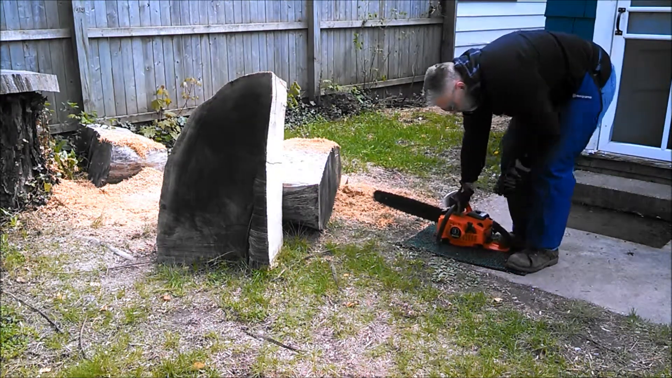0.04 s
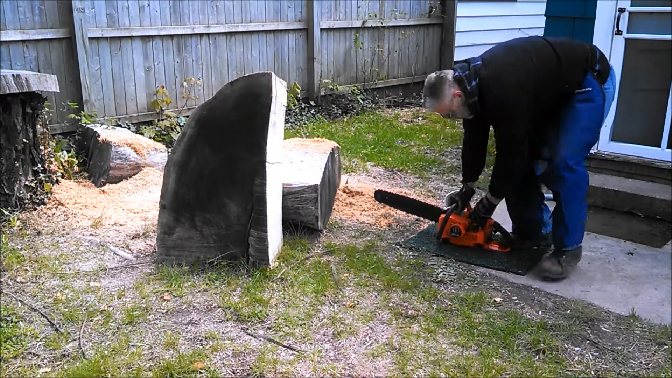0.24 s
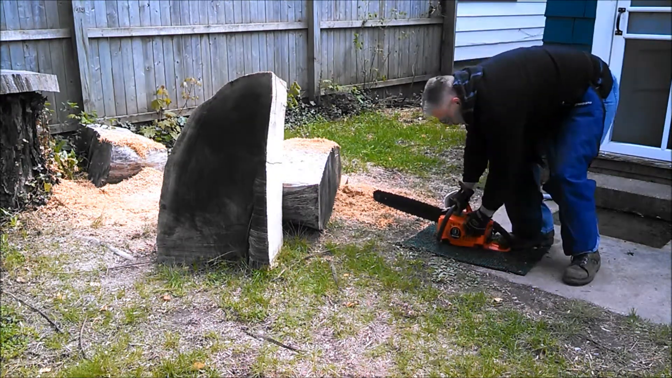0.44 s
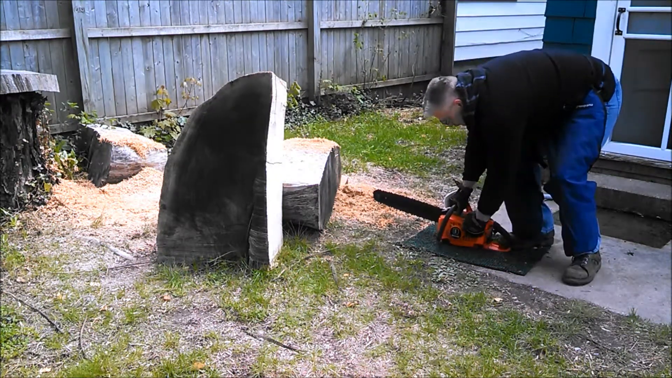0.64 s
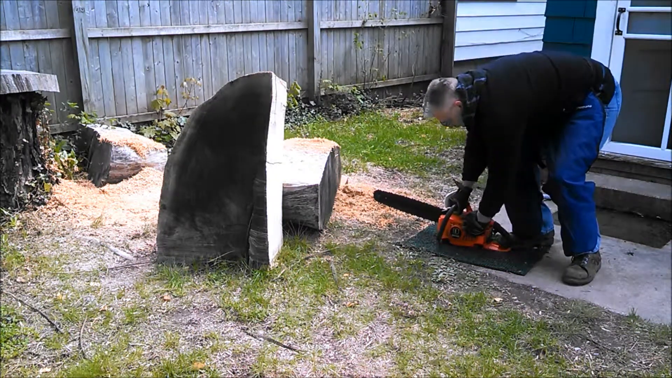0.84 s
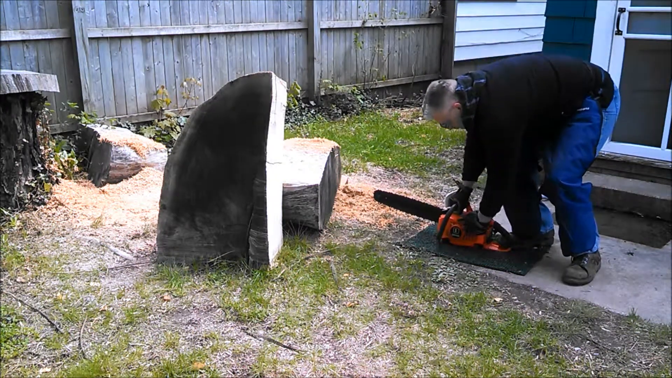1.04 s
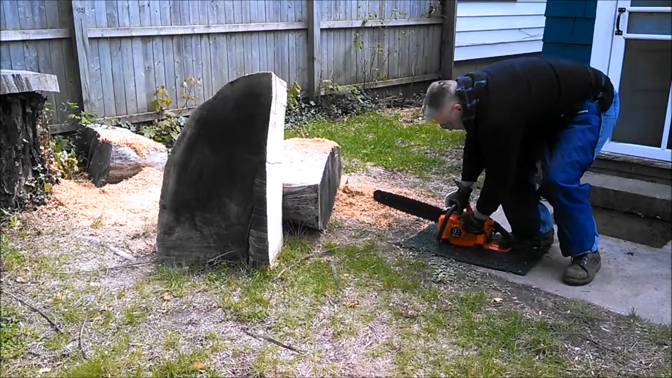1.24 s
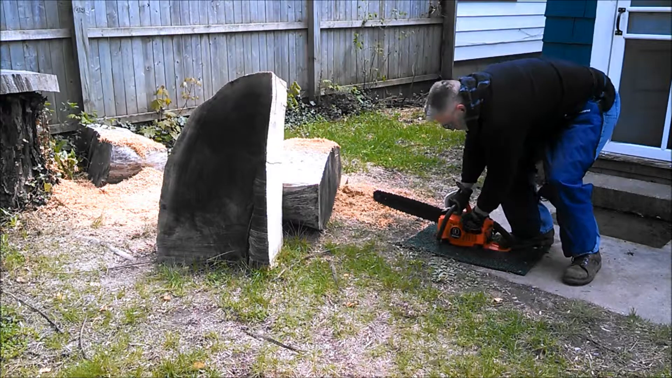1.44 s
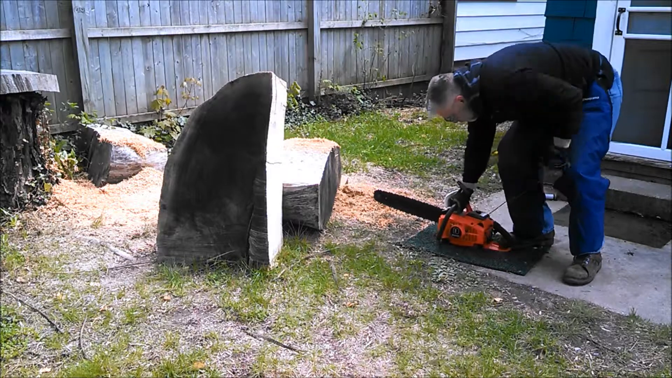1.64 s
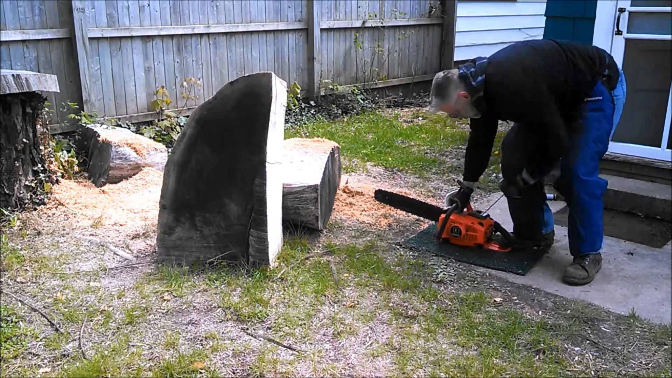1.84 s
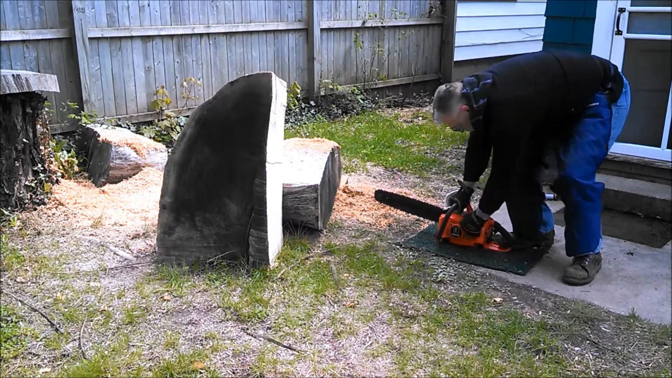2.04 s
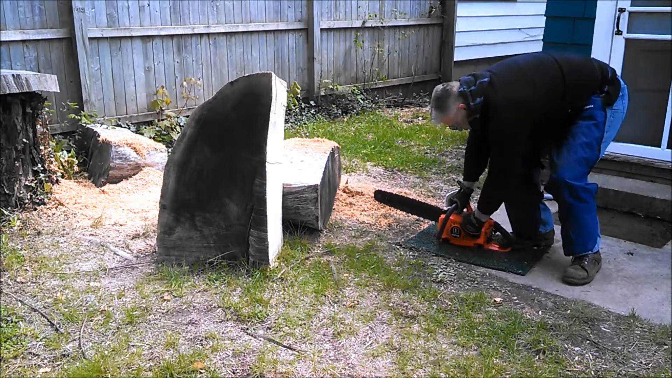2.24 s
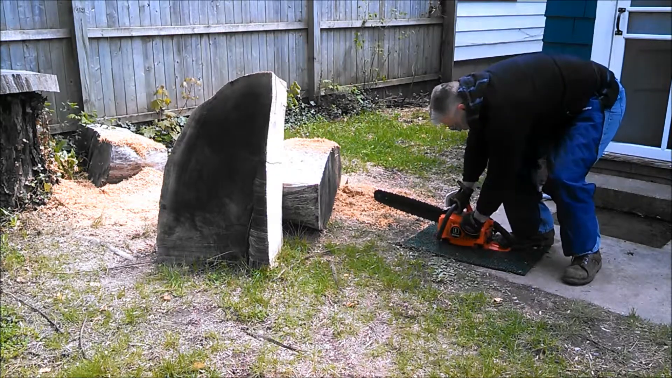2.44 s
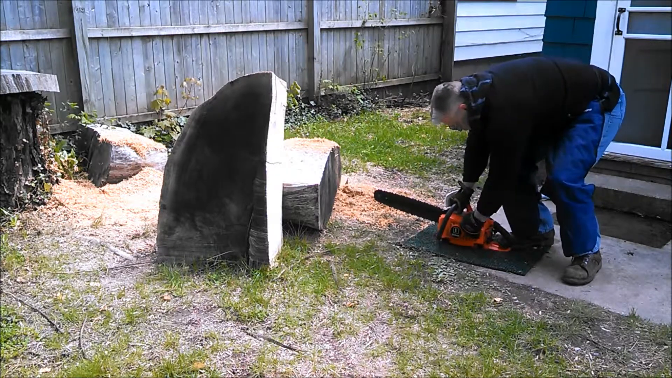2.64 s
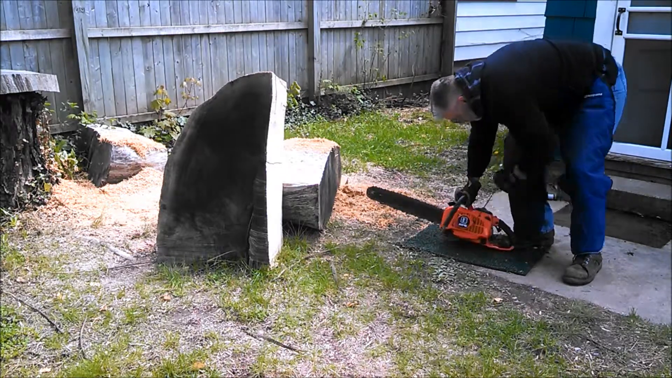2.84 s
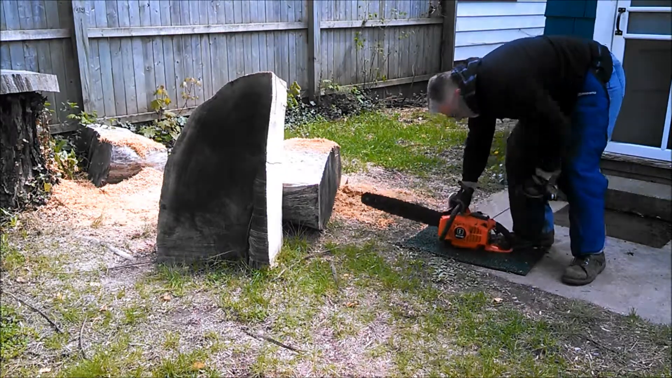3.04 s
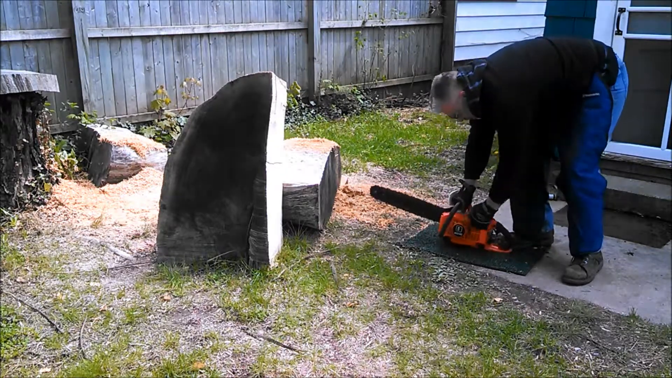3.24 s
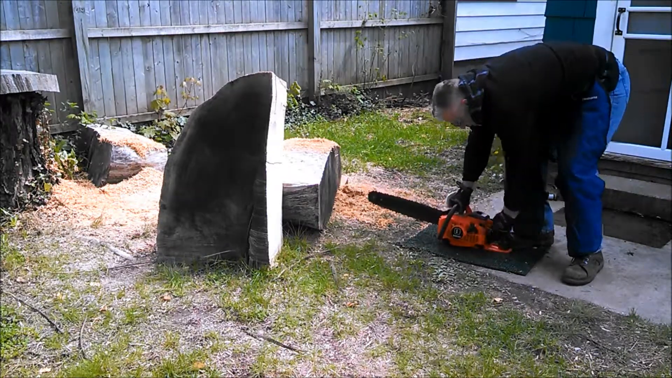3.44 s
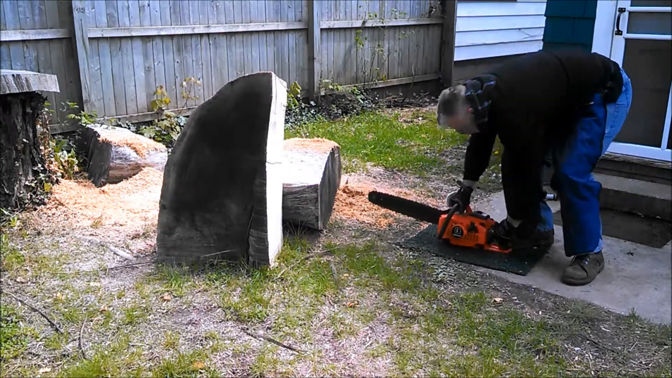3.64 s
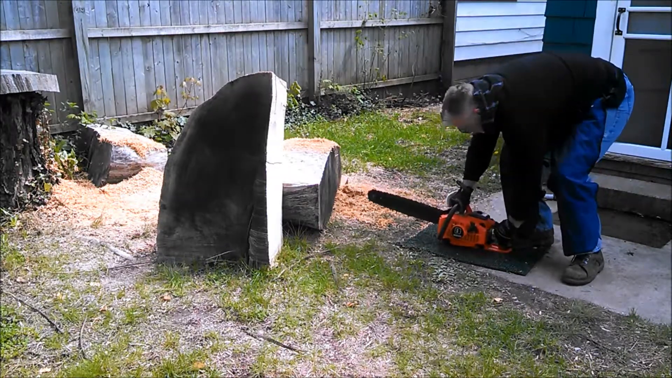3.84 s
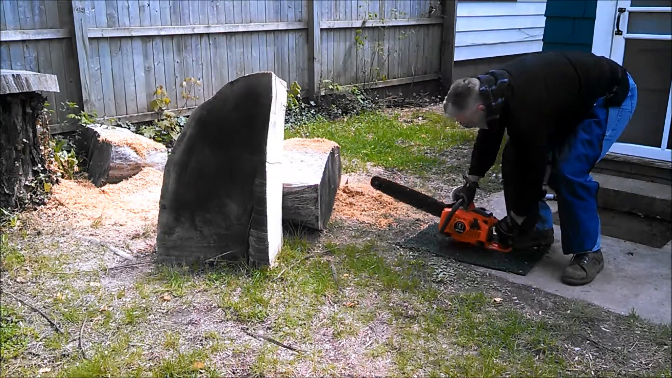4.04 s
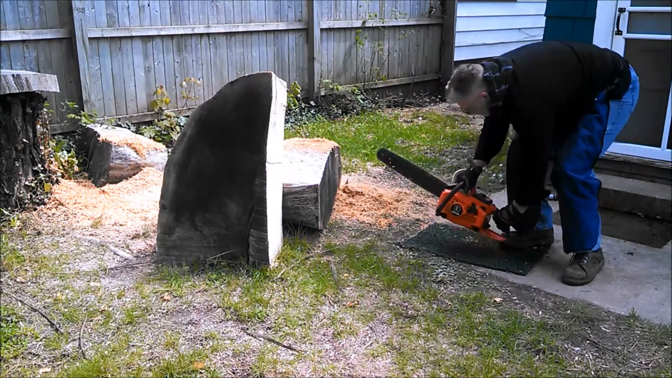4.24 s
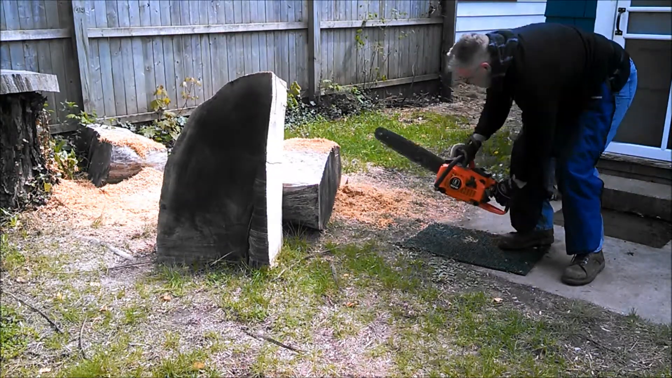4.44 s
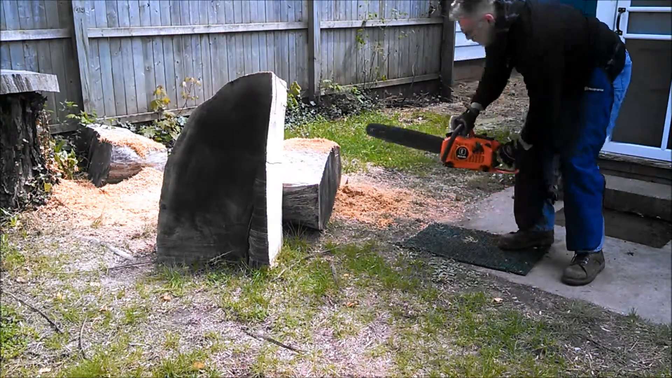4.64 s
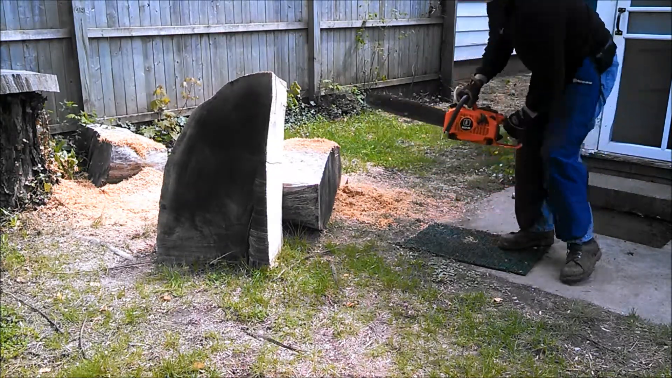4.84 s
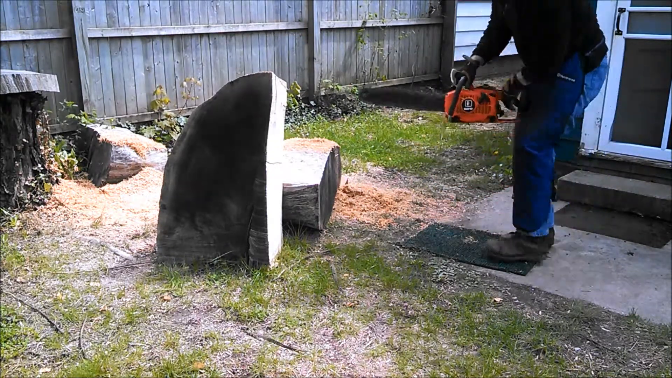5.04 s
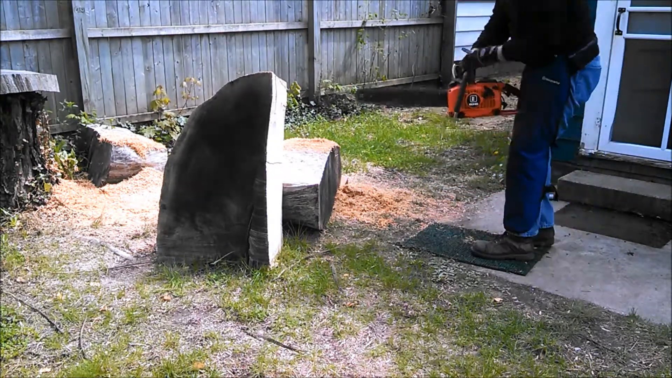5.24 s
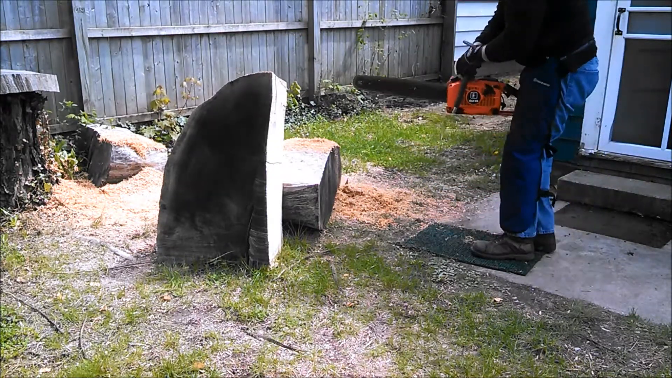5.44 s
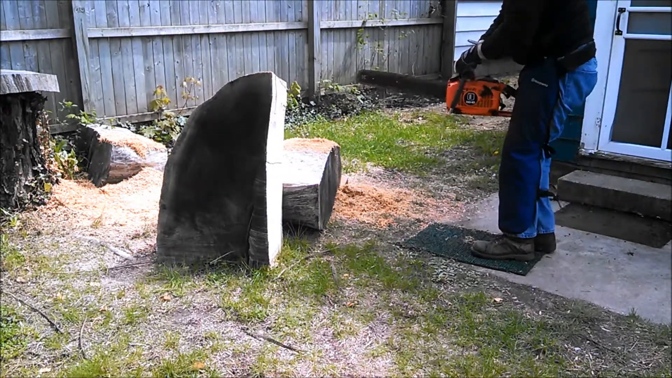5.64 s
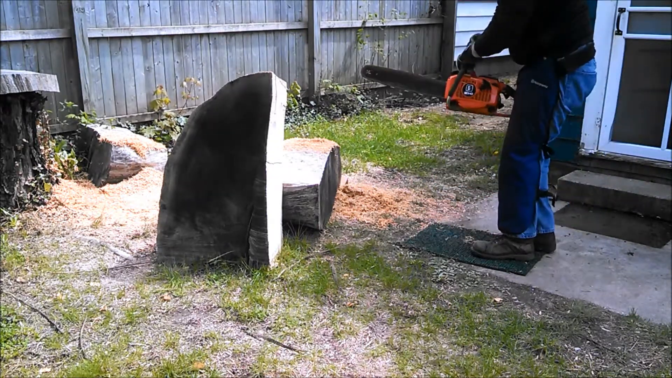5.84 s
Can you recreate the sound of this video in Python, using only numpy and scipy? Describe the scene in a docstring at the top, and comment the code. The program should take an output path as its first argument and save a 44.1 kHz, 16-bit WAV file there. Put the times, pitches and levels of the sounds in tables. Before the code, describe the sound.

A two-stroke chainsaw coughs and dies on the first cord pull, catches on the second, idles and revs twice, with birds nearby.

```python
"""Birds whistle in a fenced back yard; a shoe scuffs and a two-stroke chainsaw knocks on the ground.
At 1.6 s the starter cord is pulled, and the cold engine coughs and dies. On the second pull it catches
at 3 s and idles, each firing sending a puff through the muffler. From 3.9 s it is lifted and revved
twice, so the puffs merge into a hum and the chain hisses; then it coasts down. All along, the house
wall throws back every firing, and a delayed cross-feed widens the stereo sound."""
import sys
import numpy as np
from scipy import signal
from scipy.fft import rfft, irfft, next_fast_len
from scipy.io import wavfile
from scipy.ndimage import uniform_filter1d

SR = 44100
rng = np.random.default_rng(int(sys.argv[2]) if len(sys.argv) > 2 else 0)


def int16_out(signal):
    """Quantize to a 16-bit WAV file."""
    q = np.round(np.clip(np.atleast_2d(signal).T, -1, 1) * 32767)
    wavfile.write(sys.argv[1], SR, q.astype(np.int16))


N = 260190
TIME = np.arange(N) / SR


def from_db(db):
    """Turn decibels into a number to multiply by."""
    return 10 ** (np.asarray(db) / 20)


def rms_one(x):
    """Scale a sound to an average power of 1."""
    return x / np.sqrt(np.mean(x ** 2) + 1e-20)


def in_time(rows):
    """Join (time, value) points with straight lines."""
    return np.interp(TIME, *np.transpose(rows))


def after(start):
    """A soft switch that turns on at the given time."""
    return np.clip((TIME - start) / .007 + .5, 0, 1)


def during(rows):
    """A soft switch that is on from a table's first time to its last."""
    on = (TIME >= rows[0][0]) & (TIME <= rows[-1][0] + .005)
    return uniform_filter1d(1.0 * on, size=300)


def drift(rate):
    """A random wobble around 0 that picks a new value `rate` times a second."""
    return np.interp(TIME * rate, np.arange(4000), rng.standard_normal(4000))


def gains(points, size):
    """Spread (frequency, level) points over the frequencies of an FFT."""
    hz, db = np.transpose(points)
    grid_hz = np.arange(size // 2 + 1) * SR / size
    return from_db(np.interp(np.log(grid_hz + 1), np.log(hz), db))


def convolve(x, response):
    """Give every sample of a sound the same tail."""
    return signal.oaconvolve(x, response)[:N]


def colour(x, points, size=4096):
    """Give a sound a tone colour, with a filter that never rings ahead of it (minimum phase)."""
    cepstrum = irfft(np.log(gains(points, size)))
    cepstrum[1:size // 2] *= 2
    cepstrum[size // 2 + 1:] = 0
    response = irfft(np.exp(rfft(cepstrum)))
    return convolve(x, response / np.linalg.norm(response))


def soft_filter(x, kind, hz):
    """Gently keep the "low" or the "high" part of a sound."""
    return signal.sosfilt(signal.butter(1, hz, kind, fs=SR, output="sos"), x)


def clicks(times, heights):
    """Clicks at exact times, each shared between two neighbouring samples."""
    at = np.clip(np.asarray(times) * SR, 0, N - 2)
    whole, part = at.astype(int), at % 1
    return np.bincount(whole, heights * (1 - part), N) + np.bincount(whole + 1, heights * part, N)


def decay(x, t60):
    """Each click dies away; t60 is its fade time, the seconds it takes to fall 60 dB."""
    return signal.lfilter([1], [1, -from_db(-60 / (t60 * SR))], x + 1e-18)


def noise_bursts(x, t60):
    """Each click becomes a fading burst of noise."""
    return decay(x, t60) * rng.standard_normal(N)


def ring(x, hz, t60):
    """Each click starts a fading pure note."""
    shrink, step = from_db(-60 / (t60 * SR)), 2 * np.pi * hz / SR
    return signal.lfilter([0, np.sin(step)], [1, -2 * shrink * np.cos(step), shrink ** 2], x + 1e-18)


# tone of the distant town: (frequency [Hz], level [dB])
TOWN_TONE = [(25, -2), (60, 0), (100, -1.5), (200, -12.5), (400, -16), (650, -20.5), (950, -21.5),
             (1800, -29), (4000, -32.5), (5000, -34), (7000, -37), (10000, -42), (15000, -51)]
def outdoor_air():
    """Steady town noise, a little different in each ear."""
    mid, side = [colour(noise, TOWN_TONE) for noise in rng.standard_normal((2, N))]
    return from_db(-46) * (mid + from_db(-3) * side * np.array([[1], [-1]]))


# calls: (start [s], length [s], first pitch [Hz], middle pitch [Hz], last pitch [Hz], level [dB])
BIRD_CALLS = [(-.06, 0.17, 2450, 2628, 2400, -34.5), (0.104, 0.21, 4600, 4720, 4470, -49),
              (0.109, 0.086, 6470, 6600, 6830, -52), (0.884, 0.038, 5400, 4820, 4570, -53),
              (1.352, 0.04, 6100, 5900, 5700, -58), (2.322, 0.038, 4930, 4580, 4400, -66),
              (3.053, 0.29, 8700, 9270, 8660, -51), (3.235, 0.15, 2520, 2580, 2640, -37.5)]
def birds():
    """Thin, quavering whistles that bend through three pitches."""
    out = np.zeros(N)
    waver, quaver = 1 + .012 * drift(120), from_db(4 * drift(70) - 2)
    for start, length, *pitches, db in BIRD_CALLS:
        on = (TIME > start) & (TIME < start + length)
        progress = (TIME[on] - start) / length
        hz = np.polyval(np.polyfit([0, .5, 1], pitches, 2), progress) * waver[on]
        out[on] += from_db(db) * np.sin(np.pi * progress) * np.sin(2 * np.pi * np.cumsum(hz) / SR)
    return out * quaver


# a shoe and clothes rub as someone crouches: (time [s], level [dB])
SCUFF_LOUDNESS = [(0, -39.5), (.31, -43), (.376, -31.5), (.46, -46)]
# tone of the rubbing: (frequency [Hz], level [dB])
SCUFF_TONE = [(60, -32), (190, -16), (300, -1), (550, 4), (1100, -1.5), (2000, -0.5), (4500, -4.5),
              (7000, -8), (10000, -16), (15000, -34)]
def scuff():
    """Grit and cloth rub in uneven grains."""
    grains = rng.standard_normal(N) * from_db(in_time(SCUFF_LOUDNESS) - 12.5 + 4.3 * drift(146.4))
    return colour(grains * during(SCUFF_LOUDNESS), SCUFF_TONE)


# how far the sound leans left: (frequency [Hz], side level relative to the middle [dB])
LEFT_LEAN = [(100, -16.5), (300, -15.5), (1200, -13.5), (1700, -4), (2400, -4.5), (3600, 2), (7500, 1),
             (12000, 2)]
def from_the_side(x):
    """The sound is louder on the left, most of all in the treble."""
    size = next_fast_len(N + 4096, real=True)
    side = irfft(rfft(x, size) * gains(LEFT_LEAN, size), size)[:N]
    return np.array([x + side, x - side])


# the saw is lifted: (time [s], height [m])
SAW_HEIGHT = [(4.15, 0.026), (4.5, 0.11), (4.7, 0.36), (5.1, 0.72), (5.35, 0.893), (5.9, 0.86)]
def over_ground(x, lag_ms_per_m=1.765):
    """The bounce off the ground comes later as the saw rises, sweeping a dip down through its tone."""
    bounce = .25 * soft_filter(x, "low", hz=2050)
    lag_s = in_time(SAW_HEIGHT) * lag_ms_per_m / 1000
    return x - bounce + np.interp(TIME - lag_s, TIME, bounce)


def with_echoes(x, lags_ms=(5.22, 7.48, 8.14), strengths=(.064, .19, -.18), db_per_m=-2):
    """Slab, house wall and steps send back dull echoes that weaken as the saw is lifted."""
    echoes = sum(gain * np.interp(TIME - ms / 1000, TIME, x) for ms, gain in zip(lags_ms, strengths))
    echoes *= from_db(db_per_m * in_time(SAW_HEIGHT))
    return from_the_side(x + soft_filter(echoes, "low", hz=1400))


def yard(x, scatter_db, apart_db, t60):
    """Sound and echoes come from one side; fence and house scatter a short tail from all round."""
    t = TIME[:SR // 2]
    tails = rng.standard_normal((3, len(t))) * from_db(-60 * t / t60) * (t > .009)
    both, left, right = [convolve(x, tail / np.linalg.norm(tail)) for tail in tails]
    apart = soft_filter([left, right], "high", hz=2200)  # the two tails differ mainly in the treble
    return with_echoes(x) + from_db(scatter_db) * both + from_db(apart_db) * apart


# the notes of the saw's housing: (pitch [Hz], level [dB], fade time [s])
HOUSING_NOTES = [(1170, 3, .06), (1430, 5, .05), (1630, 2, .04)]
def struck_housing(times, db):
    """Each blow rings every note of the housing, with a slightly random strength."""
    return sum(ring(clicks(times, from_db(db + note_db + rng.normal(0, .9, len(times)))), hz, t60)
               for hz, note_db, t60 in HOUSING_NOTES)


# the four parts of a blow, dull to bright: (frequency [Hz], level [dB])
THUMP_TONE = [(50, -59), (150, -4), (240, 10), (310, 8.5), (550, 0.5), (900, -6.5), (2000, -52.5)]
CLACK_TONE = [(300, 7.5), (800, 7), (1300, 7), (2200, 1.5), (3200, -21), (8000, -58)]
SNAP_TONE = [(1000, -44), (2800, 3.5), (3700, -1), (5200, -0.5), (7000, -2.5), (9500, -17), (15000, -35.5)]
CRACK_TONE = [(2000, -25), (5000, -25), (8000, 28), (12000, 13.5), (15000, 10)]
def blows(times, thump_db, clack_db, snap_db, crack_db):
    """A blow makes a short burst in the saw's housing and sets its notes ringing."""
    def burst(db, tone, t60):
        """A click followed by dying chatter."""
        hits = clicks(times, from_db(db))
        return colour(noise_bursts(hits, t60) - 4 * hits, tone)
    dull = burst(thump_db, THUMP_TONE, t60=.055) + burst(clack_db, CLACK_TONE, t60=.033)
    bright = burst(snap_db, SNAP_TONE, t60=.034) + burst(crack_db, CRACK_TONE, t60=.043)
    return dull + bright + from_db(-15.5) * struck_housing(times, snap_db)


# knocks of the housing and starter: (time [s], level [dB], hardness [dB])
HOUSING_KNOCKS = [(0.254, -42, 7), (0.294, -55, 11), (0.359, -38, -17), (0.368, -33.5, 10),
                  (0.376, -30.5, -8), (.479, -23.5, -1), (0.517, -39, 9), (0.549, -47, 10), (0.607, -45, 4),
                  (1.667, -25, -3), (1.830, -31, 11), (1.84, -36, 5), (1.847, -29, 9), (2.081, -37, 6.5),
                  (2.088, -43, 8), (2.114, -34.5, 7.5), (2.207, -30, -5), (2.231, -30, 8.5),
                  (2.242, -35, 4), (2.325, -35, -3), (2.383, -37, 2), (2.407, -30, 5), (2.41, -32, 3),
                  (2.437, -42, 3), (2.822, -37.5, 5.5), (2.878, -31, 1), (3.012, -22, 5),
                  (3.042, -22.5, 2.5), (3.106, -36, 11), (3.507, -28, 4), (5.381, -28, 10.5),
                  (5.461, -19, 2), (5.864, -15, -12)]
# rows for thump, clack, snap and crack: (level [dB], change with hardness [dB per dB])
KNOCK_PARTS = [(-4, -0.55), (-2.5, 0), (-8.5, 0.66), (-31.5, 2.5)]
def knocks():
    """The harder the contact, the less thump and the more crack."""
    times, db, hardness_db = np.transpose(HOUSING_KNOCKS)
    return blows(times, *[db + part_db + slope * hardness_db for part_db, slope in KNOCK_PARTS])


# thuds, then clinks, one note a row: (time [s], level [dB], pitch [Hz], fade time [s])
GROUND_THUDS = [(.479, -24.5, 480, 0.068), (.479, -16.5, 353, 0.037), (.479, -28, 240, 0.027),
                (.525, -22.5, 290, 0.029), (.565, -34, 247, 0.033)]
STARTER_CLINKS = [(1.833, -27, 3420, 0.038), (1.849, -34, 3420, 0.073), (1.850, -23, 7170, 0.015),
                  (2.115, -36, 6730, 0.03), (2.233, -36.5, 3344, 0.081), (2.327, -49, 6730, .05),
                  (2.406, -42, 3380, 0.073), (2.406, -45, 7080, 0.13), (2.824, -49, 7140, 0.1),
                  (3.108, -21.5, 3330, 0.028)]
def thuds_and_clinks():
    """The housing thuds as it is pressed down; the starter's catches clink onto the flywheel."""
    return sum(ring(clicks([time], from_db([db])), hz, t60)
               for time, db, hz, t60 in [*GROUND_THUDS, *STARTER_CLINKS])


# the cord runs out or winds back: (start [s], end [s], level at the end [dB])
CORD_RUNS = [(1.63, 1.693, -38), (1.955, 2.036, -31.5), (2.856, 3, -26)]
# rattle and hiss of metal, in starter and engine alike: (frequency [Hz], level [dB])
RATTLE_TONE = [(100, -32), (350, 12), (700, 8.5), (1000, 7), (1300, 2.5), (1520, 3), (1630, 5.5),
               (1730, -4.5), (2100, 0), (2700, 2.5), (3600, -1), (4700, -6), (6500, -12.5), (15000, -53)]
HISS_TONE = [(500, -6), (2000, 8.5), (3500, -5.5), (5000, 3), (6000, 3.5), (7100, 5), (8000, 1.5),
             (9500, -5), (12000, -11), (15000, -20.5)]
def starter_cord(swell_db_per_s=153):
    """The cord runs ever faster, so its reel rattles and hisses ever louder."""
    pull = sum(from_db(db - swell_db_per_s * np.abs(end - TIME)) * after(start) * (1 - after(end))
               for start, end, db in CORD_RUNS)
    grit = from_db(3.3 * drift(350))
    rattle, hiss = from_db(-4) * pull * grit * rng.standard_normal((2, N))
    return colour(rattle, RATTLE_TONE) + from_db(-9) * colour(hiss, HISS_TONE)


# trigger squeezes: (start [s], let go [s], opening [0-1], time to shut [s])
SQUEEZES = [(3.906, 4.138, 0.92, 0.087), (4.1, 4.62, 0.91, 0.03), (4.733, 5.056, 1, 0.1),
            (5.807, 5.9, 0.33, .05)]
def throttle(open_s=.1):
    """How open the throttle is, 0-1: each squeeze opens it, holds it and lets it shut."""
    return np.max([opening * np.clip(np.minimum((TIME - start) / open_s, 1 - (TIME - end) / shut_s), 0, 1)
                   for start, end, opening, shut_s in SQUEEZES], axis=0)


# speeds [turns per s]: idle, clutch fully gripping, pops half merged, load easing, no load left
IDLE_RATE, CLUTCH_RATE, HUM_RATE, EASE_RATE, FREE_RATE = 39.5, 80, 95, 133.4, 156
SPUTTER_DB, SPUTTER_MS = 3, .048  # extra unevenness while coasting
def engine_load(speed):
    """How hard the engine works, 0-1: an open throttle pulls hard until near top speed."""
    return throttle() * np.clip((FREE_RATE - speed) / (FREE_RATE - EASE_RATE), 0, 1)


def coasting(speed):
    """1 while the engine spins well above idle with the throttle shut."""
    return (1 - throttle()) * np.clip(speed / IDLE_RATE - 1, 0, 1)


def humming(speed):
    """Rises from 0 to 1 as the separate pops merge into a tone."""
    return np.clip((speed - HUM_RATE) / 20 + .5, 0, 1)


def crank(speed_rows):
    """The engine shaft's speed, and its turns since the table's first time."""
    speed = in_time(speed_rows)
    turns = np.cumsum(speed) / SR
    return speed, turns - np.interp(speed_rows[0][0], TIME, turns)


def once_a_turn(speed, turns, angle, scatter_db, jitter_ms, wander=0):
    """A click at one point (angle, 0-1) of every turn, less even while the engine coasts."""
    times = np.interp(np.arange(0, turns[-1] - 1) + angle, np.maximum.accumulate(turns + wander), TIME)
    level_chance, time_chance = rng.standard_normal((600, 2))[:len(times)].T
    sputter = np.interp(times, TIME, coasting(speed))
    late_ms = time_chance * (jitter_ms + SPUTTER_MS * sputter)
    slowness = np.minimum(IDLE_RATE / np.interp(times, TIME, speed), 1)
    db = level_chance * (scatter_db * slowness + SPUTTER_DB * sputter)
    return clicks(times + late_ms / 1000, from_db(db)) * np.sqrt(SR / speed)


def moving_parts(speed, turns, rattle_gain, chain_gain, count=5):
    """Piston and clutch slap loosely; the chain ticks and hisses along the bar, surging each turn."""
    slaps = sum(once_a_turn(speed, turns, angle, scatter_db=-1, jitter_ms=.035, wander=.022 * drift(7))
                for angle in rng.random(count)) / np.sqrt(count)
    fast = np.clip(speed / 110, 0, 1)
    surge = rms_one(from_db(1.2 * np.cos(2 * np.pi * (turns - .15)) + 2.3 * drift(45)))
    link_ticks = (rng.random(N) < 5000 / SR) * rng.standard_normal(N)
    rattle = 1.28 * fast * slaps + .5 * surge * rng.standard_normal(N)
    chain = surge * rms_one(rms_one(link_ticks) + 3.8 * rng.standard_normal(N))
    return colour(rattle * rattle_gain, RATTLE_TONE) + colour(chain * chain_gain, HISS_TONE)


# the muffler's own notes: (pitch [Hz], width [Hz], boost or cut [dB])
MUFFLER_NOTES = [(172, 43, -0.5), (307, 9.3, 8.5), (426, 94, 5), (512, 53, 1), (940, 48, -14)]
def muffler(x):
    """The muffler's chambers ring on at some pitches and swallow others."""
    return x + sum((from_db(db) - 1) * signal.lfilter(*signal.iirpeak(hz, hz / width, fs=SR), x)
                   for hz, width, db in MUFFLER_NOTES)


def rushing_gas(pops, t60):
    """Gas tears out after each pop, with about the same energy however long it lasts."""
    return noise_bursts(pops, t60) * np.sqrt(2 * np.log(1000) / (t60 * SR))


# the exhaust's low boom and harsh bark: (frequency [Hz], level [dB])
BOOM_TONE = [(30, -36), (60, -4), (100, 3.5), (135, 9.5), (170, 8.5), (220, 1), (300, 1.5), (600, -80.5)]
BARK_TONE = [(150, -85.5), (450, 0), (650, 1), (850, 7.5), (1000, 2), (1300, -23), (2000, -16.5),
             (3000, -16), (6000, -23), (15000, -81)]
def exhaust(speed, turns, puff_tone, puff_db, boom_db, bark_db):
    """Once a turn the exhaust port opens and lets out a puff, with a boom and a bark."""
    pops = once_a_turn(speed, turns, angle=0, scatter_db=2.5, jitter_ms=.025)
    # at high speed the five lowest harmonics are taken out, to make room for the hum
    low_harmonics = 2 * np.sqrt(speed / SR) * sum(np.cos(2 * np.pi * k * turns) for k in range(1, 6))
    firings = humming(speed) * low_harmonics - pops
    # at low speed the engine gulps air between puffs
    gulps = once_a_turn(speed, turns, angle=.46, scatter_db=2.5, jitter_ms=.018)
    firings += from_db(-4.5) * np.clip(2 - speed / 14, 0, 1) * gulps
    puffs = firings + np.exp(-speed / 62) * rushing_gas(pops, t60=.17)  # faster burns cleaner
    boom = colour(firings * from_db(boom_db), BOOM_TONE)
    rough_firings = firings + .2 * rushing_gas(pops, t60=.016)
    bark = colour(rough_firings * from_db(bark_db), BARK_TONE)
    return boom + muffler(colour(puffs * from_db(puff_db), puff_tone)) + bark


# the first try: (time [s], speed [turns per s])
FALSE_START_SPEED = [(1.685, 10.6), (1.76, 27.4), (1.83, 28.6), (1.95, 21.7), (2.08, 12.0), (2.36, 6.6)]
# the lower voice of the cold, choked muffler: (frequency [Hz], level [dB])
COLD_PUFF_TONE = [(60, -23), (130, -17.5), (200, 0.5), (255, 6), (310, 3.5), (360, -0.5), (450, -1),
                  (560, -12.5), (900, -39), (2000, -23), (6000, -80)]
def false_start(dies_s=1.952, stops_s=2.42):
    """The choked engine fires for a moment and runs down."""
    def fading(db, db_per_s):
        """A level that holds until the engine dies, then falls."""
        return db - db_per_s * np.maximum(TIME - dies_s, 0)
    speed, turns = crank(FALSE_START_SPEED)
    not_stopped = 1 - after(stops_s)
    turning = after(FALSE_START_SPEED[0][0]) * not_stopped
    puffs = exhaust(speed, turns, COLD_PUFF_TONE,
                    puff_db=fading(-29.5, 98), boom_db=fading(-19.5, 44), bark_db=fading(-48.5, 82))
    rattle_gain = turning * from_db(fading(-35, 47))
    chain_gain = turning * from_db(fading(-53.5, 93))
    return puffs * not_stopped + moving_parts(speed, turns, rattle_gain, chain_gain)


# the cold engine fires hard: (time [s], jolt level [dB], clutch ring [dB], chain slap [dB])
JOLTS = [(3.127, -13.5, -17, -23), (3.213, -16.5, -22, -22), (3.28, -27, -29, -39),
         (3.312, -24.5, -35, -47), (3.380, -18, -29, -18), (3.44, -27, -20.5, -29),
         (3.501, -23, -22, -26.5), (3.586, -14, -21, -17), (3.666, -42, -20.5, -31),
         (3.747, -20.5, -34, -30), (3.77, -18, -23, -25), (3.822, -16.5, -21, -26),
         (3.896, -16, -19.5, -25.5), (3.966, -15, -14.5, -23.5)]
# the slack chain hitting the bar: (frequency [Hz], level [dB])
SLAP_TONE = [(2400, -44), (3400, 7), (4100, 1.5), (5000, -16), (9000, -37)]
def hard_firings(rebound_s=.0073):
    """The jolted housing knocks and rebounds, the clutch drum rings and the chain slaps the bar."""
    times, db, ring_db, slap_db = np.transpose(JOLTS)
    drum = ring(clicks(times + .0077, from_db(ring_db)), hz=2332, t60=.014)
    slap_times = times + .0015
    hits = clicks(slap_times, from_db(slap_db))
    rebounds = clicks(slap_times + rebound_s, from_db(slap_db + 2))
    slaps = from_db(-8) * colour(noise_bursts(hits, t60=.051), SLAP_TONE)
    snaps = from_db(-15.5) * colour(noise_bursts(hits + rebounds, t60=.015), SNAP_TONE)
    housing = blows(times, thump_db=db + .5, clack_db=db - 13, snap_db=db - 20.5, crack_db=db - 45)
    return housing + drum + slaps + snaps


# harmonics 1 to 5, before the bass lift: (level coasting [dB], level at full throttle [dB])
HUM_HARMONICS = [(-44, -24), (-32, -35), (-40, -20), (-37.5, -21), (-43.5, -24)]
def hum(speed, turns):
    """At high speed the muffler pumps out a fluttering tone that changes with throttle and load."""
    out = np.zeros(N)
    for k, (coast_db, open_db) in enumerate(HUM_HARMONICS, 1):
        drive = throttle() if k == 1 else np.sqrt(throttle() * engine_load(speed))
        bass_lift = np.sqrt(1 + (420 / (k * np.maximum(speed, 50))) ** 2)
        flutter_db = .5 * drift(110) + SPUTTER_DB * coasting(speed) * drift(25)
        db = coast_db + (open_db - coast_db) * drive + flutter_db
        out -= from_db(db) * bass_lift * np.cos(2 * np.pi * k * turns)
    return out * humming(speed)


# the running engine's puff: (frequency [Hz], level [dB])
PUFF_TONE = [(60, -47.5), (130, -9), (175, 3), (250, -2), (310, 1.5), (410, 7.5), (530, 1.5), (680, -8),
             (900, -29), (2000, -37), (6000, -108)]
def running(speed, turns, catch_s=2.99):
    """The engine catches; speed and load set its levels, and above idle the clutch drives the chain."""
    def level(idle_db, below, above, load_db):
        """Level at idle, plus dB per halving (below) or doubling (above) of speed, plus load."""
        octaves = np.log2(speed / IDLE_RATE)
        speed_db = below * np.maximum(-octaves, 0) + above * np.maximum(octaves, 0)
        return idle_db + speed_db + load_db * engine_load(speed)
    puff_db = level(-28.5, below=-7.5, above=-2, load_db=5.5)
    boom_db = level(-25.5, below=3.5, above=-1.5, load_db=10)
    bark_db = level(-40, below=-25, above=3.5, load_db=11)
    rattle_db = level(-33.5, below=-5, above=2, load_db=8.5)
    chain_db = level(-30, below=6.5, above=1.12, load_db=1.5)
    caught = after(catch_s)  # until then the engine only pumps air
    grip = np.clip((speed - IDLE_RATE) / (CLUTCH_RATE - IDLE_RATE), from_db(-28.5), 1)
    puffs = exhaust(speed, turns, PUFF_TONE, puff_db, boom_db, bark_db)
    parts = moving_parts(speed, turns, caught * from_db(rattle_db), caught * grip * from_db(chain_db))
    # a shut throttle at high speed starves the exhaust; a hard firing strengthens it
    starved = (1 - throttle()) * np.clip((speed - 113) / 17, 0, 1)
    jolt_db = decay(clicks(np.transpose(JOLTS)[0], 1.64), t60=.12)
    strength_db = jolt_db - 16 * (1 - caught) - 16 * starved - 5 * coasting(speed)
    return puffs * from_db(strength_db) + parts


# the second start, then the revs: (time [s], speed [turns per s])
START_UP_SPEED = [(2.894, 6.8), (2.999, 10.9), (3.129, 21.7), (3.249, 28.8), (3.369, 31.3), (3.619, 37.3),
                  (3.749, 38.2), (3.959, 41.9), (4.009, 57), (4.119, 60.2), (4.22, 64.9)]
REVVING_SPEED = [(4.33, 85), (4.394, 97), (4.448, 106.7), (4.578, 127), (4.635, 132), (4.726, 119),
                 (4.788, 111.7), (4.872, 129.5), (4.968, 143), (5.072, 155), (5.174, 136.3), (5.426, 111.1),
                 (5.474, 108), (5.802, 82), (5.856, 80), (5.9, 102)]
def scene():
    """Two starts of the saw, its handling and the birds, all in the yard."""
    speed, turns = crank([*START_UP_SPEED, *REVVING_SPEED])
    saw = starter_cord() + false_start() + running(speed, turns) + hard_firings()
    saw += knocks() + thuds_and_clinks()
    sources = over_ground(saw) + scuff() + birds()
    in_yard = yard(sources, scatter_db=-8.5, apart_db=-17, t60=.17)
    return in_yard + with_echoes(over_ground(hum(speed, turns))) + outdoor_air()


def record(dry):
    """Each channel has the other subtracted a moment later, widening the sound; the top treble is cut."""
    cross_feed, lag_samples, cutoff_hz = .97, 16, 15600
    other_channel = np.pad(dry[::-1], ((0, 0), (lag_samples, 0)))[:, :N]
    wide = dry - cross_feed * other_channel
    return signal.sosfilt(signal.ellip(10, .1, 80, cutoff_hz, fs=SR, output="sos"), wide)


dry = scene()
out = record(dry)
int16_out(out)
```